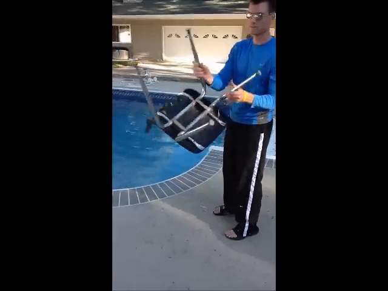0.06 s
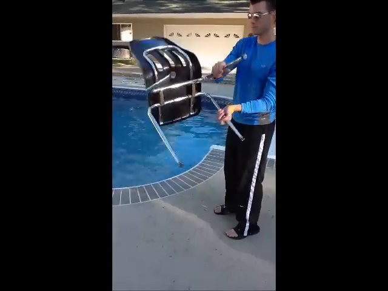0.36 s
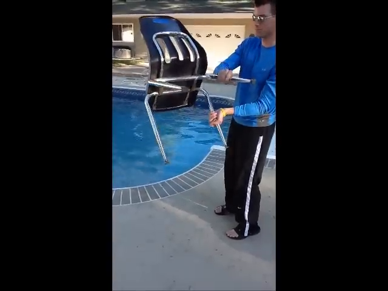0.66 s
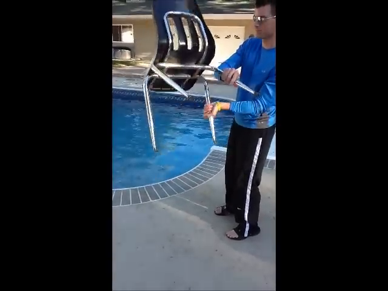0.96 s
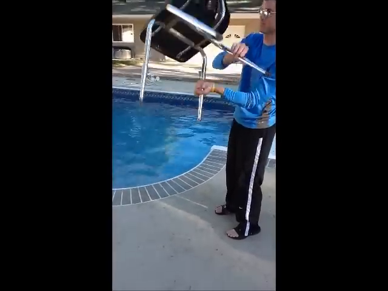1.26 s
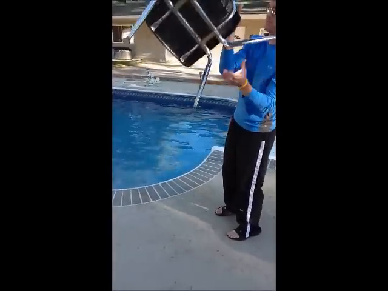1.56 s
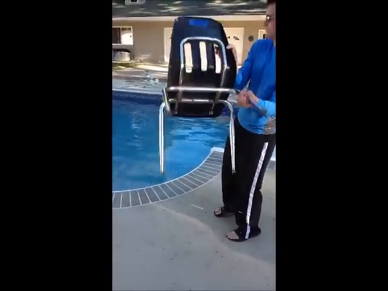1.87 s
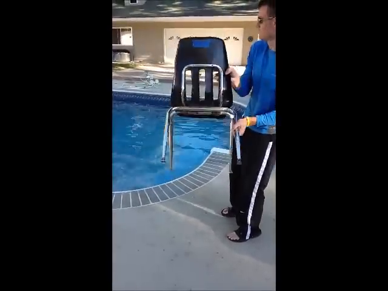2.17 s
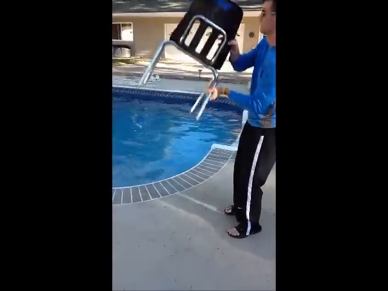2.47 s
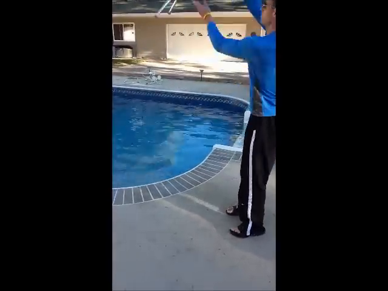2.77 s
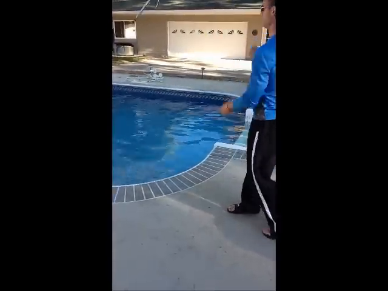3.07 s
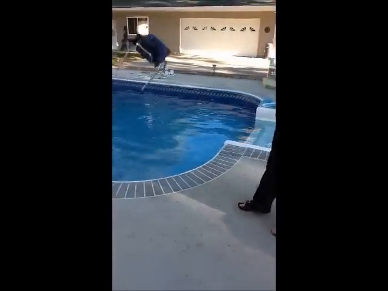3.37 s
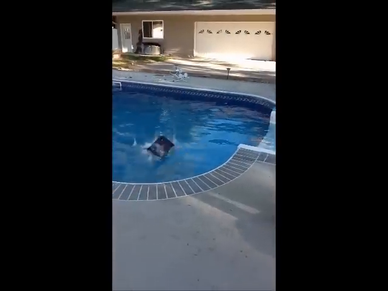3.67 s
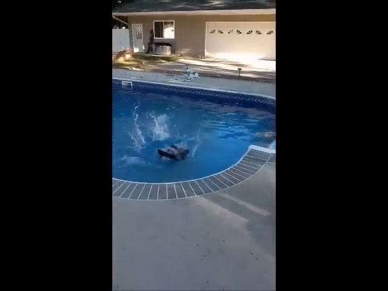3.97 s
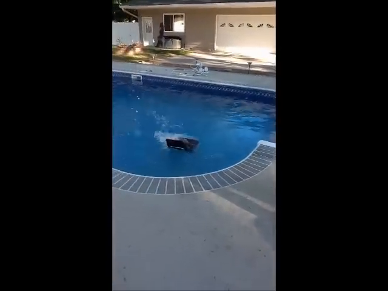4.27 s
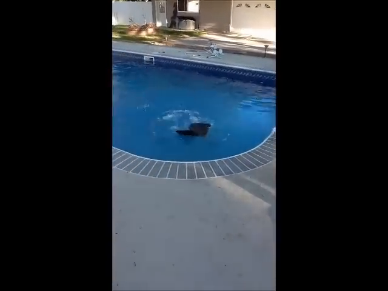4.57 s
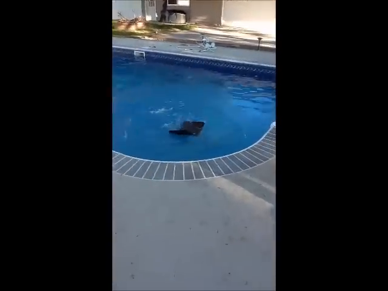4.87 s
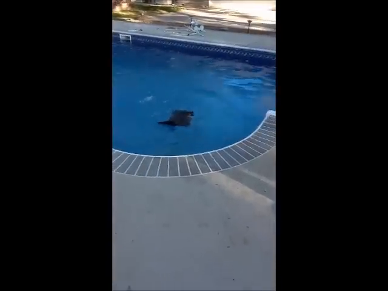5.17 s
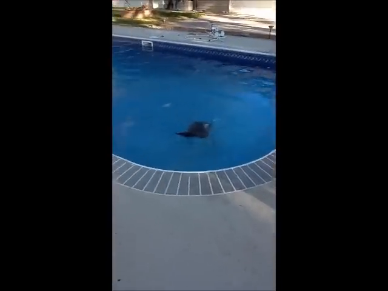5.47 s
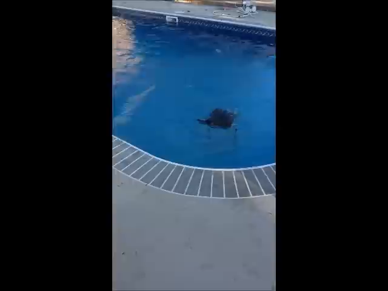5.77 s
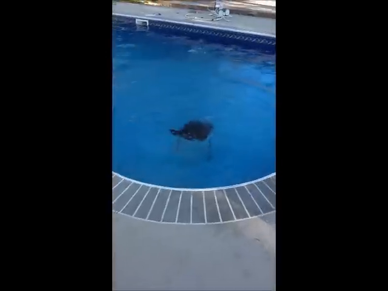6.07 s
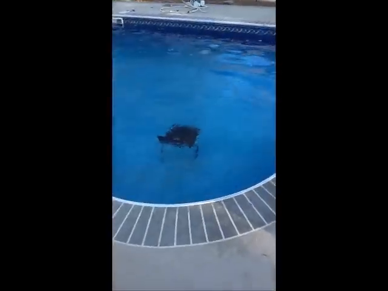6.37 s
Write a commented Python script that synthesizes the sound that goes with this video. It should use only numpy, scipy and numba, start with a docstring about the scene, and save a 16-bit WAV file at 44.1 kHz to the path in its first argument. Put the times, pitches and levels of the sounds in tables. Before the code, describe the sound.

Faint distant traffic murmurs throughout, heard in a backyard through one phone microphone. At about 0.4 seconds a plastic chair's steel tube legs clink lightly as hands turn it. Between 1.6 and 2 seconds comes a louder cluster of ringing metal knocks, with a dull seat thud and palms rubbing the steel. A far car swells softly around 2.5 seconds, and a few more light ticks follow until 3 seconds. At about 3.7 seconds the legs cut into the pool, and at 3.8 the seat slaps the water with a loud splash and a brief hollow boom, echoing slightly off the house. Spray rains back over churning foam, with distinct drops pattering from 4.3 to 5 seconds. The sinking chair gulps at about 4.8 seconds. Small laps and a faint fizz of froth trail off, with one last soft gulp near 6.2 seconds.

```python
"""Distant traffic murmurs, then a plastic chair on steel tube legs knocks and rubs as hands turn it.
It is thrown into a backyard pool: the legs cut in, the seat slaps the water and trapped air booms.
Spray rains back, the sinking chair gulps and the leftover froth fizzes.
One phone microphone hears it all, with a short echo off the house."""
import sys
import numpy as np
from scipy import signal
from scipy.fft import rfft, irfft, next_fast_len
from scipy.io import wavfile
from numba import njit

SR = 44100
rng = np.random.default_rng(int(sys.argv[2]) if len(sys.argv) > 2 else 0)


def dump(signal):
    """Clip the signal to [-1, 1] and save it as 16-bit WAV at the path in sys.argv[1]."""
    limited = np.clip(np.atleast_2d(signal).T, -1, 1)
    pcm = np.round(limited * 32767).astype(np.int16)
    wavfile.write(sys.argv[1], SR, pcm)


N = 287075
T = np.arange(N) / SR
TOP_HZ = 15350  # the phone cuts off above this


def undb(db):
    """Turn decibels into a plain multiplier."""
    return 10 ** (np.asarray(db) / 20)


def unit(x):
    """Scale to an average (rms) level of 1."""
    return x / np.sqrt(np.mean(x ** 2))


def peak(x):
    """Scale to a peak of 1."""
    return x / np.abs(x).max()


def add(out, start_s, x):
    """Mix x into out from start_s on."""
    i = int(start_s * SR)
    out[i:i + len(x)] += x[:N - i]


def colour(x, tone):
    """Filter x along a tone curve, with rows of pitch_hz, level_db."""
    size = next_fast_len(2 * len(x))
    size += size % 2
    hz, db = np.transpose(tone)
    bins_hz = np.maximum(np.arange(size // 2 + 1) * SR / size, 1)
    cepstrum = irfft(np.log(undb(np.interp(np.log(bins_hz), np.log(hz), db))))
    # fold it so the filter never rings ahead of the sound
    cepstrum[1:size // 2] *= 2
    cepstrum[size // 2 + 1:] = 0
    return irfft(rfft(x, size) * np.exp(rfft(cepstrum)))[:len(x)]


def noise(tone):
    """Steady noise shaped by a tone curve, at level 1."""
    return unit(colour(rng.standard_normal(N), tone))


def wander(rate_hz):
    """A random drift, mostly between -1 and 1."""
    return np.interp(T * rate_hz, np.arange(1024), rng.standard_normal(1024))


def swell(top_s, level_db, rise_db_per_s, hold_s, fall_db_per_s):
    """A volume curve that rises until top_s, holds, then falls."""
    before_s = np.maximum(top_s - T, 0)
    after_s = np.maximum(T - top_s - hold_s, 0)
    return undb(level_db - rise_db_per_s * before_s - fall_db_per_s * after_s)


def shower(start_s, length_s, level_db, fall_db_per_s, scatter_db, low_hz, high_hz, count):
    """Times, levels and pitches of small random events that weaken as they go on."""
    when, size, pitch = rng.random((count, 3)).T
    age_s = length_s * (np.arange(count) + when) / count
    db = level_db - fall_db_per_s * age_s + scatter_db * (2 * size - 1)
    return start_s + age_s, db, low_hz * (high_hz / low_hz) ** pitch


def modes(table, t, scatter_db=0.5, detune=0.01):
    """An object's own ringing notes; each blow and grip shifts their levels and pitches a little."""
    hz, db, ring_s = np.transpose(table)[:, :, None]
    size, shift, sign = rng.standard_normal((len(table), 3)).T[:, :, None]
    gain = undb(db + scatter_db * size)
    waves = np.sign(sign) * np.sin(2 * np.pi * hz * (1 + detune * shift) * t)
    return (gain * undb(-60 * t / ring_s) * waves).sum(0) / np.sqrt(np.sum(gain ** 2))


@njit
def ring(start_s, hz, cycles, gain, glide):
    """Notes that fade to 37% in `cycles` waves and climb in pitch, like bubbles nearing the surface."""
    out = np.zeros(N)
    lives = cycles * SR / hz
    for k, life in enumerate(lives):
        phase, first = 0., int(start_s[k] * SR)
        for i in range(min(int(6 * life) + 2, N - first)):
            phase += 2 * np.pi * hz[k] / SR * (1 + glide * i / (6 * life))
            out[first + i] += gain[k] * np.exp(-i / life) * np.sin(phase)
    return out


def bubbles(tone, density, low_hz, high_hz, cycles, spread_db, count):
    """A swarm of random bubbles at level 1; a density below 1 makes them fewer but louder."""
    start_s, end_s = 3.7, 5.5
    when, pitch, size, life, luck = rng.random((count, 5)).T
    times = start_s + (end_s - start_s) * when
    chance = np.clip(np.interp(times, T, density), .3, 1)
    hz = low_hz + (high_hz - low_hz) * pitch
    fade_cycles = cycles * (0.29 + 2 * life ** 2)
    gain = undb(spread_db * np.minimum(-np.log(size), 4))
    gain *= np.sqrt(hz / fade_cycles / chance)  # make up for short or sparse bubbles
    keep = luck < chance
    swarm = colour(ring(times[keep], hz[keep], fade_cycles[keep], gain[keep], glide=.2), tone)
    return swarm / np.std(swarm[(T > start_s) & (T < end_s)])


# tone of the far road and of one car's tyres: pitch_hz, level_db
ROAD_TONE = [(30, -23), (50, -19), (70, -17), (105, -4), (140, -3.5), (190, 3.5), (310, -4), (900, -4),
             (1500, -6.5), (2300, -14), (3600, -23.5), (7000, -34), (15000, -41.5)]
TYRE_TONE = [(100, -30.5), (190, 9), (270, 2.5), (350, -2.5), (440, 6), (530, 6.5), (650, -1.5), (850, 4.5),
             (1400, -19), (4000, -32)]
# that car's engine pulls twice: top_s, level_db, rise_db_per_s, hold_s, fall_db_per_s
ENGINE_PULLS = [(2.44, -50, 110, .33, 38), (3.395, -50, 33, 0.16, 40)]
def traffic(car_hz=230.6, idle_hz=71.4):
    """A road murmurs and wavers, one engine idles, and a far car swells and fades."""
    road = noise(ROAD_TONE) * swell(0, -46, 0, hold_s=1.44, fall_db_per_s=.93) * undb(.5 * wander(6))
    car_phase = 2 * np.pi * np.cumsum(car_hz * (1 + 0.041 * wander(30))) / SR
    engine = unit(np.sin(car_phase) * undb(5.7 * wander(14)))
    engine *= sum(swell(*pull) for pull in ENGINE_PULLS)
    tyres = noise(TYRE_TONE) * swell(2.47, -45.5, 31, hold_s=.26, fall_db_per_s=16)
    tyres *= undb(1.1 * wander(8.4))
    idle_phase = 2 * np.pi * np.cumsum(idle_hz * (1 + 0.022 * wander(24))) / SR
    idle = unit(np.sin(idle_phase)) * swell(0, -66, 0, hold_s=1.1, fall_db_per_s=6)
    overtone = unit(np.sin(2 * idle_phase) * undb(2.4 * wander(17)))
    overtone *= swell(0, -57.5, 0, hold_s=1.5, fall_db_per_s=3)
    return road + engine + tyres + idle + overtone


# notes of the steel legs and the plastic seat: pitch_hz, level_db, ring_s (time to fade by 60 dB)
TUBE_NOTES = [(1580, 1, .12), (2140, -2, 0.33), (2500, -8.5, 0.54), (2683, -2, 0.28), (3410, 3, 0.11),
              (3715, 3.5, 0.35), (4010, 7, 0.078), (4260, 1, 0.14), (4650, 1.5, 0.13), (5650, -2.5, 0.37),
              (5870, -6, 0.36), (6060, -11, 0.17), (6920, -4, 0.35), (7620, -3, 0.26), (8060, -3, .1),
              (9100, 1.5, 0.051), (10100, -19, .09), (10600, -9, 0.1), (11200, -2, 0.11), (12320, -17, .1),
              (12910, -7, .1), (13450, -6, 0.071), (14100, -15, 0.052), (14100, -3, 0.06)]
SEAT_NOTES = [(144, -2, 0.17), (214, -6, 0.12), (348, -2, 0.053), (447, 0, 0.066), (514, -3, 0.34),
              (690, -23, 0.073), (820, -5, .13), (936, 3.5, 0.06), (1430, 1, 0.04), (1830, -2, 0.068)]
# tone of the seat's dull thud: pitch_hz, level_db
THUD_TONE = [(80, -17), (140, -3), (250, 3.5), (550, -4.5), (1000, -8.5), (2000, -16), (4000, -24)]
# knocks on the chair: start_s, tube_db, centre_hz, width_octaves, seat_db, grip_fade_s
CHAIR_KNOCKS = [(0.352, -40.5, 3500, 0.83, -62, .015), (0.385, -34.5, 7340, 0.37, -64, 0.0046),
                (0.6336, -42, 11000, 1, -64, .01), (1.5505, -46.5, 3720, 0.13, -60, .2),
                (1.668, -43.5, 5460, .45, -65, 0.072), (1.7095, -23.5, 11000, 0.92, -27, .08),
                (1.7247, -27, 3600, 1.1, -23.5, 0.054), (1.728, -25, 6500, 1.2, -33, 0.086),
                (1.7395, -28, 900, 1.2, -28.5, .003), (1.8098, -35, 6200, 0.35, -58, 0.031),
                (1.855, -32, 1500, 0.67, -54, 0.0082), (1.887, -35, 4570, 0.43, -68, 0.02),
                (1.9285, -33, 8500, 1.5, -59, 0.044), (2.277, -46.5, 7000, 0.54, -66, .02),
                (2.7587, -41.5, 6000, 1.4, -62, 0.049), (2.80, -51, 3960, .05, -66, .3),
                (2.866, -38, 3800, 1.3, -55, .005), (2.9563, -46, 5000, .95, -61, .03),
                (3.7268, -25, 2370, 0.19, -45, .028)]
def chair():
    """Each knock rings the legs and seat; a loose joint buzzes, and the hand's grip damps the steel."""
    out, t = np.zeros(N), np.arange(SR // 3) / SR
    bands_hz = np.geomspace(100, 20000, 48)
    for start_s, tube_db, centre_hz, width_octaves, seat_db, grip_fade_s in CHAIR_KNOCKS:
        buzz = undb(-1) * rng.standard_normal(len(t)) * np.exp(-t / 0.017)
        steel = (modes(TUBE_NOTES, t) + buzz) * np.exp(-t / grip_fade_s)
        # where and how hard the knock lands decides which notes stand out
        contact_db = -10 * np.log10(1 + (np.log2(bands_hz / centre_hz) / width_octaves) ** 4)
        steel = colour(steel, np.transpose([bands_hz, contact_db]))
        thud = colour(rng.standard_normal(len(t)) * np.exp(-t / 0.018), THUD_TONE)
        seat = undb(-3.5) * peak(modes(SEAT_NOTES, t)) + peak(thud)
        add(out, start_s, undb(tube_db) * peak(steel) + undb(seat_db) * seat)
    return out


# tone of skin rubbing steel: pitch_hz, level_db
RUB_TONE = [(1000, -12), (2500, -1.5), (4000, -0.5), (6500, 0), (9000, -7.5), (15000, -23)]
# the legs slide through the hands: top_s, level_db, rise_db_per_s, hold_s, fall_db_per_s
RUBS = [(.37, -63, 171, .02, 250), (1.70, -55.5, 201.5, 0.033, 100), (1.93, -55.5, 260, .02, 350),
        (2.95, -60, 220, 0.014, 250), (3.16, -63, 250, 0.0044, 250)]
def hands():
    """Palms rub along the steel with a rough, uneven hiss."""
    return noise(RUB_TONE) * sum(swell(*rub) for rub in RUBS) * undb(2 * wander(120))


# tone of a torn sheet of water: pitch_hz, level_db
SHEET_TONE = [(200, -28), (480, 4), (850, -2), (1200, 1), (1700, -0.5), (2600, 0), (4000, -6), (8000, -6.5),
              (15000, -10)]
# chair parts hit the water: start_s, sheet_db, fade_s, pulse_db, pulse_hz
WATER_SLAPS = [(3.7264, -32.5, .032, -14, 2440), (3.732, -42, .008, -19, 1080),
               (3.7458, -29, .01, -24, 800), (3.755, -29, 0.053, -42, 2500), (3.772, -26, 0.019, -24, 2300),
               (3.7833, -15.5, 0.0093, -12, 2350), (3.785, -8, .0016, 0, 1370),
               (3.788, -22.5, .012, -8.5, 1000), (3.793, -14.5, 0.0076, -19, 1130),
               (3.8062, -16.5, 0.017, -6, 1260), (3.8285, -22, 0.0049, -6.5, 2310)]
def slaps():
    """Each part that hits the water sends out a pressure pulse and tears off a crackling sheet."""
    power = np.zeros(N)
    for start_s, sheet_db, fade_s, _, _ in WATER_SLAPS:
        add(power, start_s, undb(sheet_db) ** 2 * np.exp(-2 * T[:SR // 2] / fade_s))
    sheet = bubbles(SHEET_TONE, np.ones(N), 390, TOP_HZ, cycles=0.5, spread_db=2, count=50000)
    start_s, _, _, pulse_db, pulse_hz = np.transpose(WATER_SLAPS)
    pulses = ring(start_s, pulse_hz, cycles=.8, gain=undb(pulse_db), glide=.12)
    return sheet * np.sqrt(power) + pulses


# air pockets close under water, and a few drops plop as they land: start_s, pitch_hz, peak_db, length_cycles
POCKETS_AND_PLOPS = [(3.766, 268, -23.5, 1.8), (3.785, 250, -10, .8), (3.789, 324, -19.5, 3.5),
                     (3.791, 536, -14.5, 3.2), (3.796, 128, -20.5, 2.14), (3.811, 230, -6.5, 0.81),
                     (3.826, 622, -20, 4.3), (3.856, 250, -18.5, 2.07), (3.986, 196, -29.5, 1.2),
                     (4.017, 220, -27.5, 0.92), (4.061, 1050, -30.5, 5.8), (4.108, 177, -33.5, 1.9),
                     (4.444, 1080, -35.5, 6.6), (4.452, 338, -36.5, 2.1)]
def air_pockets():
    """Trapped air booms briefly, rising a little in pitch; the hole behind the seat adds small pockets, and a
    few landing drops plop."""
    out, t = np.zeros(N), T[:SR // 4]
    breakup = shower(start_s=3.87, length_s=.65, level_db=-32.5, fall_db_per_s=24,
                     scatter_db=.5, low_hz=168.4, high_hz=373, count=15)
    small_pockets = [(start_s, hz, db, 2.1) for start_s, db, hz in zip(*breakup)]
    for start_s, hz, peak_db, length_cycles in POCKETS_AND_PLOPS + small_pockets:
        age = t * hz / length_cycles
        bloom = (age / .75 * np.exp(1 - age / .75)) ** 2
        add(out, start_s, undb(peak_db) * bloom * np.sin(2 * np.pi * hz * t * (1 + 0.014 * age)))
    return out


# tone of the spray and of the foam: pitch_hz, level_db
SPRAY_TONE = [(1500, -7.5), (2600, 1), (4000, -0.5), (6000, -2.5), (9000, -3.5), (15000, -7)]
FOAM_TONE = [(150, -8.5), (350, 0), (600, 5), (1100, 2), (1600, -0.5), (2400, -2), (3500, -21)]
# spray flies off the seat, then lands: top_s, level_db, rise_db_per_s, hold_s, fall_db_per_s
SPRAY_BURSTS = [(3.84, -33.3, 900, 0, 76), (4.12, -36.6, 48, .08, 28)]
# foam as the hole caves in, spray churns the pool and a wave laps the seat: same columns
FOAM_SURGES = [(3.84, -32.8, 900, .085, 115), (4.04, -41.3, 45, .3, 26), (5.16, -49, 150, .02, 60)]
def spray_and_foam():
    """Spray falls as fine mist and small ringing bubbles over churning foam, thinning as it dies."""
    spray_gain = np.sqrt(sum(swell(*row) ** 2 for row in SPRAY_BURSTS))
    foam_gain = np.sqrt(sum(swell(*row) ** 2 for row in FOAM_SURGES))
    density = peak(spray_gain) ** .8
    plinks = bubbles(SPRAY_TONE, density, 1280, 14600, cycles=4.6, spread_db=2, count=16000)
    mist = noise(SPRAY_TONE)
    foam = bubbles(FOAM_TONE, np.sqrt(density), 210.6, 3486, cycles=3.85, spread_db=2.5, count=8000)
    return (undb(-1.5) * plinks + undb(-5.5) * mist) * spray_gain + foam * foam_gain


# drops that land at set times: start_s, level_db, pitch_hz
TIMED_DROPS = [(4.286, -27, 3830), (4.4443, -19, 2750), (4.4915, -22, 3400), (4.527, -25, 8000),
               (4.5783, -25.5, 3240), (4.624, -29, 5460), (4.6752, -27, 6500), (4.696, -24.5, 7800),
               (4.7118, -23, 6370), (4.739, -25.5, 6060), (4.849, -29.5, 3520), (4.911, -33.5, 9200),
               (4.9875, -28.5, 9900), (5.7771, -35, 11000)]
def drips():
    """Late drops, some at set times and more at random, each tick, spatter and leave a small ringing bubble."""
    random_drops = shower(start_s=4.5, length_s=.35, level_db=-27.5, fall_db_per_s=7,
                         scatter_db=1, low_hz=3000, high_hz=10900, count=10)
    landings = TIMED_DROPS + list(zip(*random_drops))
    times, db, hz = np.transpose(landings)
    ticks = ring(times, hz, cycles=.8, gain=undb(db), glide=.11)
    plinks = ring(times + .0006, hz, cycles=8., gain=undb(db - 20), glide=.13)
    spatter, t = np.zeros(N), T[:SR // 20]
    for start_s, level_db, pitch_hz in landings:
        burst = rng.standard_normal(len(t)) * np.exp(-t / 0.0032)
        burst = colour(burst, [(pitch_hz / 4, -20), (pitch_hz, 0), (pitch_hz * 4, -20)])
        add(spatter, start_s, undb(level_db - 6.5) * peak(burst))
    return ticks + plinks + spatter


# gulps and laps around the sinking chair: start_s, pitch_hz, level_db
SINKING_GULPS = [(4.82, 392, -28.5), (4.824, 404, -33), (4.836, 383, -27.5), (4.8457, 503, -31),
                 (5.158, 950, -39), (5.185, 805, -43), (5.52, 222, -39), (5.656, 450, -38),
                 (6.238, 382, -33.5)]
def gulps():
    """Water closes over the seat with a low, rising gulp and a higher smack."""
    start_s, hz, db = np.transpose(SINKING_GULPS)
    glugs = ring(start_s, hz, cycles=1.2, gain=undb(db), glide=.39)
    smacks = ring(start_s, 1.95 * hz, cycles=1.1, gain=undb(db - 2), glide=.18)
    return glugs + smacks


def fizz():
    """The froth left on the surface bursts in a faint, bright hiss."""
    hiss = noise([(1500, -14), (6000, -1), (15000, -0.5)])
    return hiss * swell(5, -60.6, 27, hold_s=.6, fall_db_per_s=8)


def yard_echo(x, near_db, far_db, ring_s):
    """The deck and pool wall scatter the sound at once; house and fence send back a duller tail."""
    t = T[:SR]
    near = rng.standard_normal(SR) * np.exp(-t / 0.014) * (t > .001)
    far = colour(rng.standard_normal(SR), [(200, -7.5), (2000, -10), (6000, -6), (15000, -13)])
    far *= np.minimum(t / .04, 1) * undb(-60 * t / ring_s)
    echo = undb(near_db) * near / np.linalg.norm(near) + undb(far_db) * far / np.linalg.norm(far)
    return x + signal.fftconvolve(x, echo)[:N]


def scene():
    """Chair and water in the yard, over traffic and microphone hiss; the same in both channels."""
    close = chair() + hands() + slaps() + air_pockets() + spray_and_foam()
    close = yard_echo(close, near_db=-14, far_db=-16, ring_s=0.71) + drips() + gulps() + fizz()
    # small objects and open water give off almost no deep bass
    close = signal.sosfilt(signal.butter(4, 110, "high", fs=SR, output="sos"), close)
    hiss = undb(-63.5) * noise([(1000, -0.95), (6000, 0.092), (15000, -0.55)])
    mono = close + traffic() + hiss
    return np.array([mono, mono])


def record(dry):
    """The phone thins the deep bass and cuts the highest treble."""
    thin = signal.sosfilt(signal.butter(3, 55, "high", fs=SR, output="sos"), dry)
    return signal.sosfilt(signal.ellip(10, .2, 80, TOP_HZ, fs=SR, output="sos"), thin)


dry = scene()
out = record(dry)
dump(out)
```